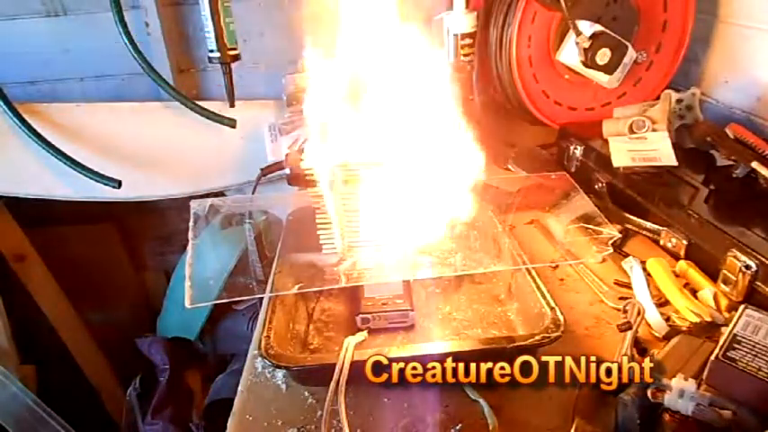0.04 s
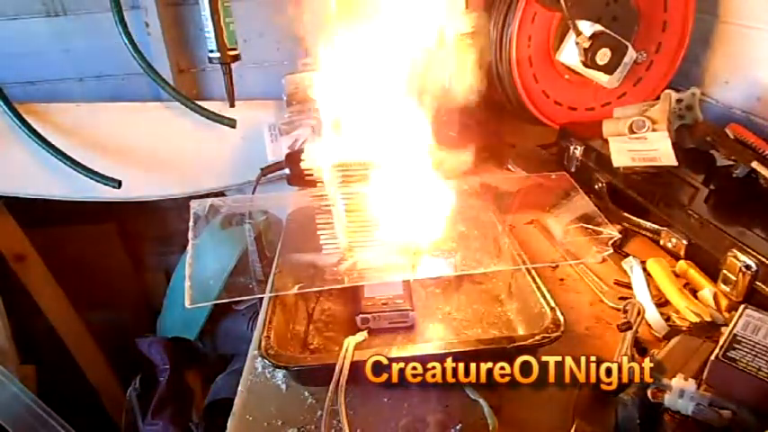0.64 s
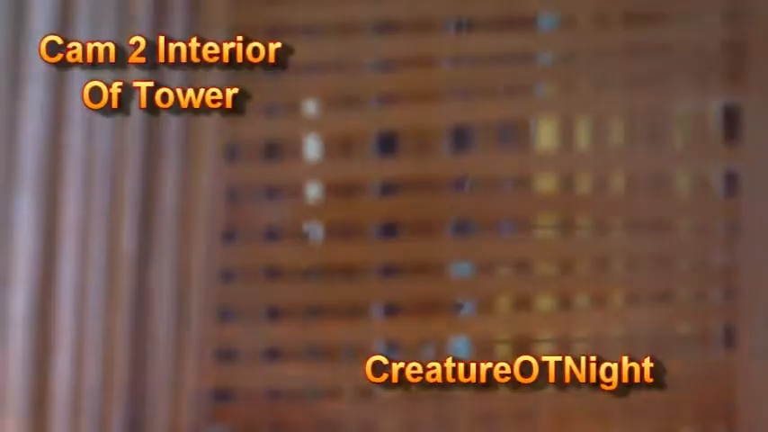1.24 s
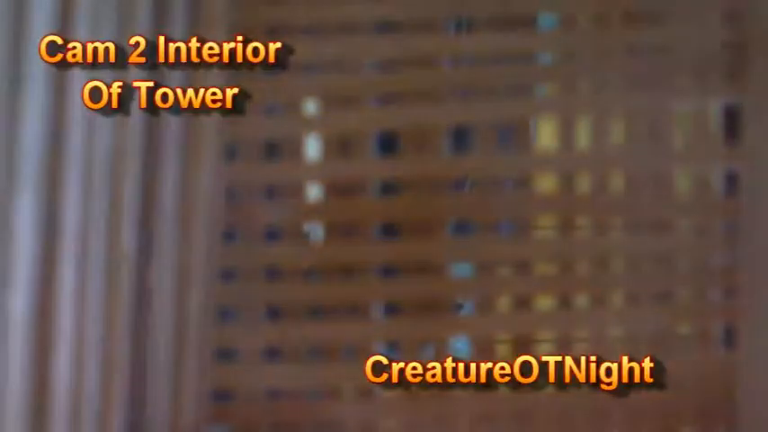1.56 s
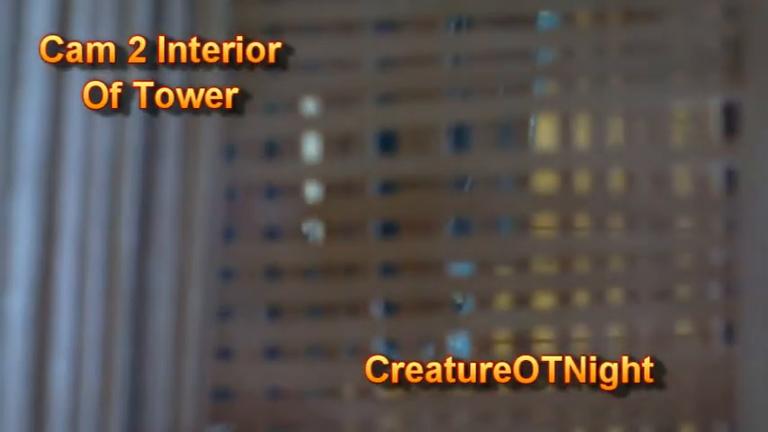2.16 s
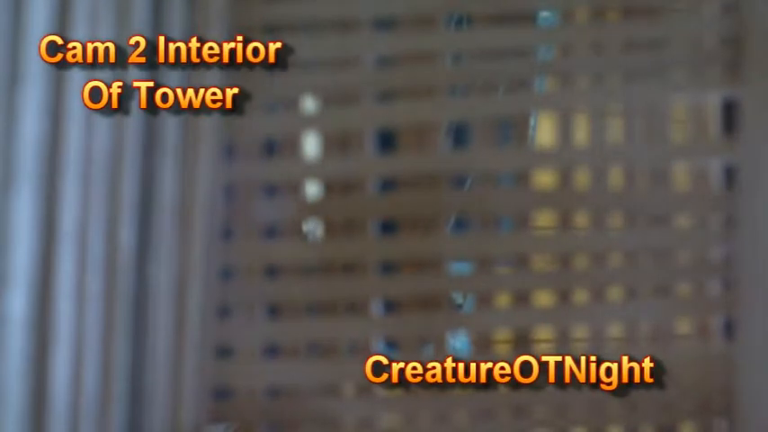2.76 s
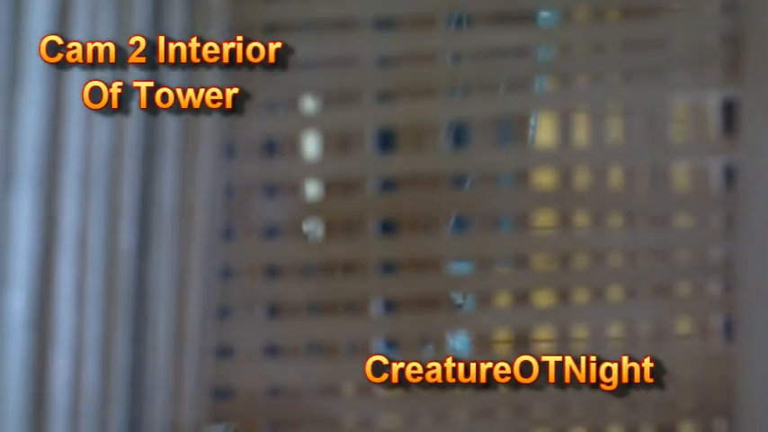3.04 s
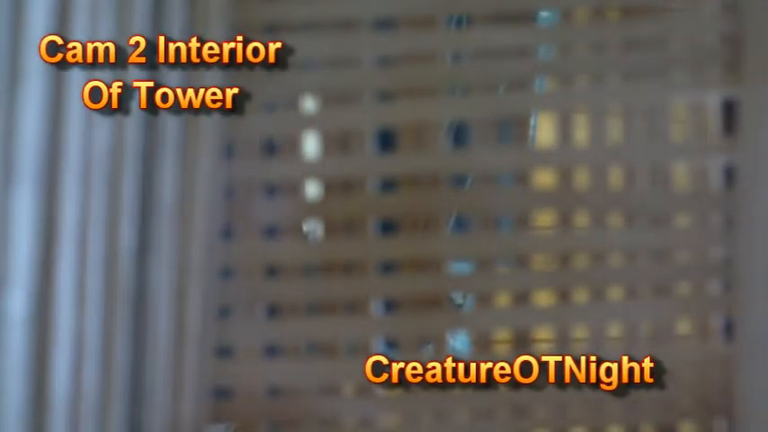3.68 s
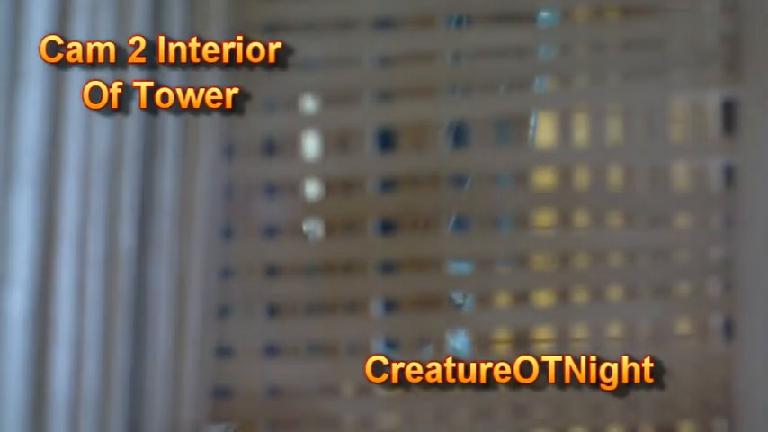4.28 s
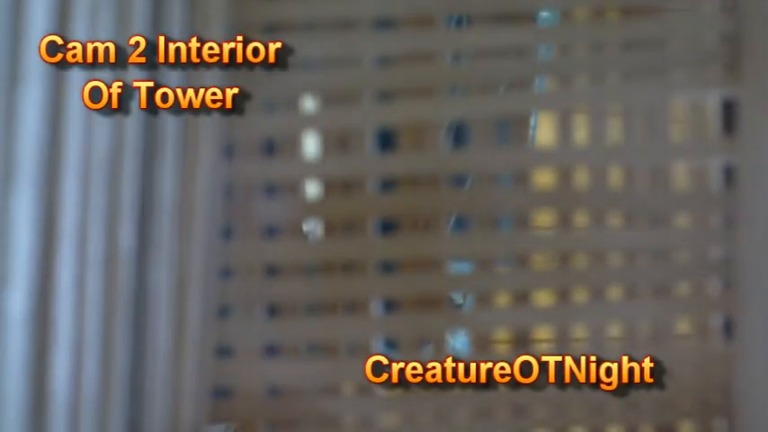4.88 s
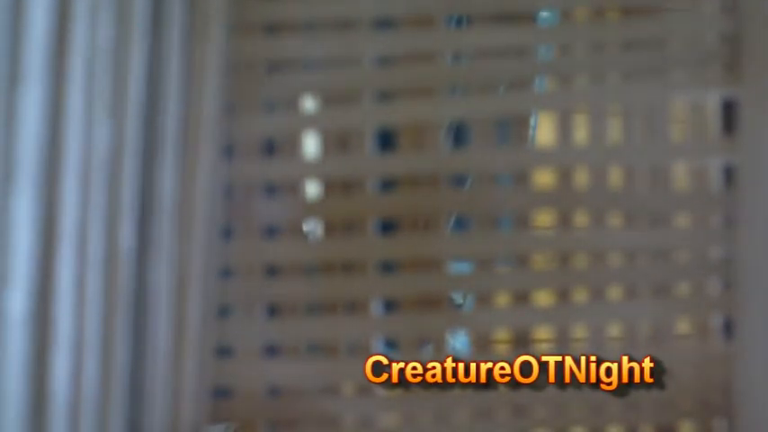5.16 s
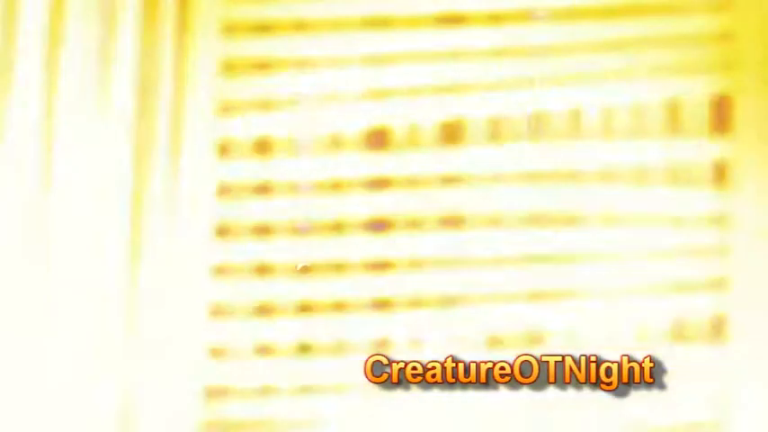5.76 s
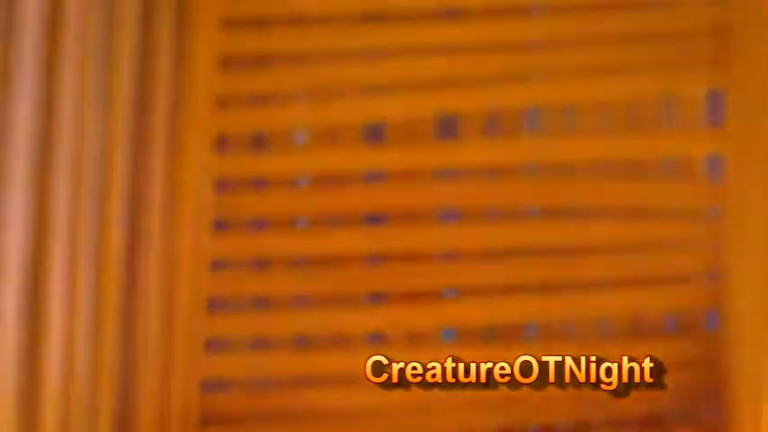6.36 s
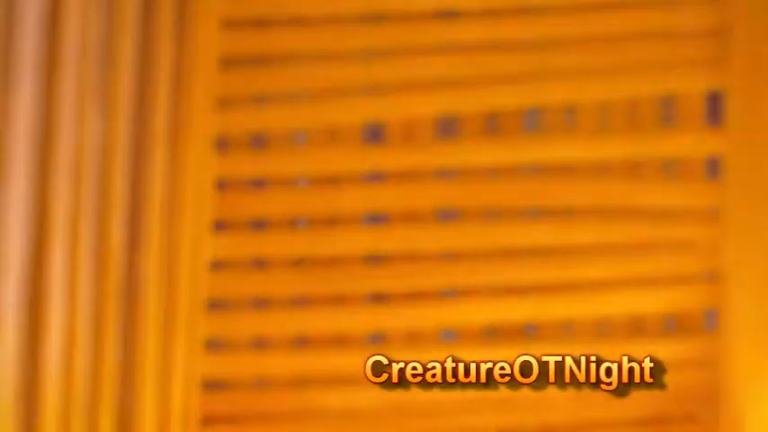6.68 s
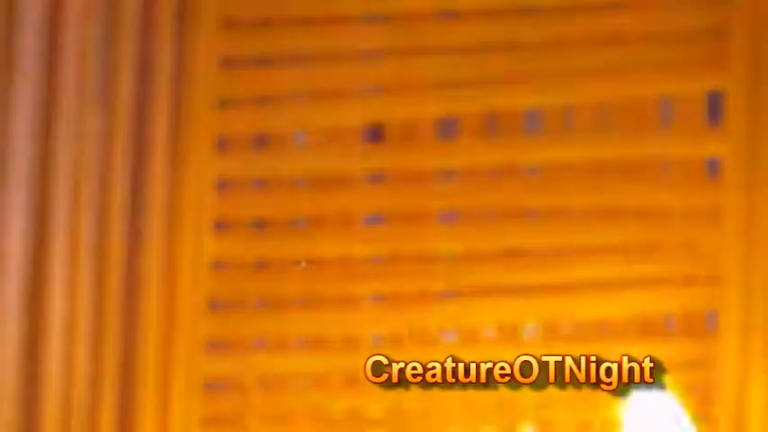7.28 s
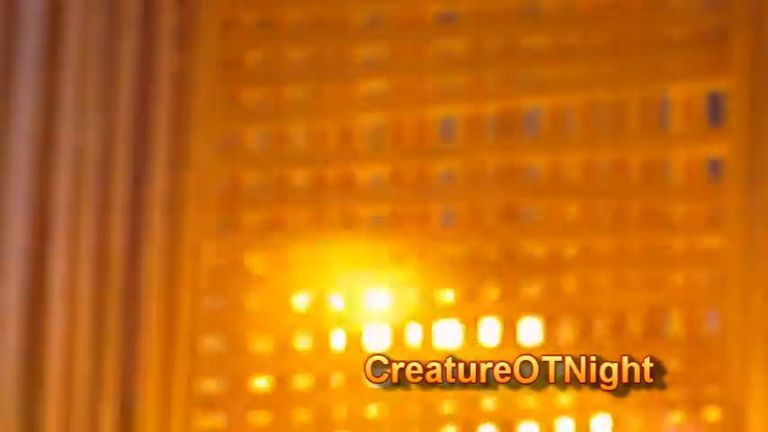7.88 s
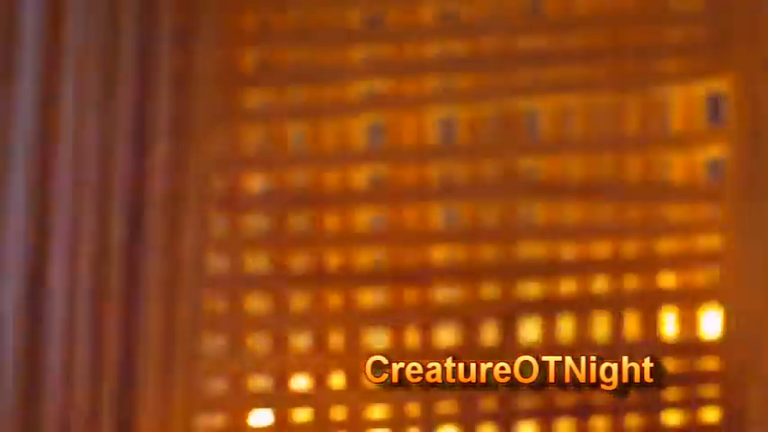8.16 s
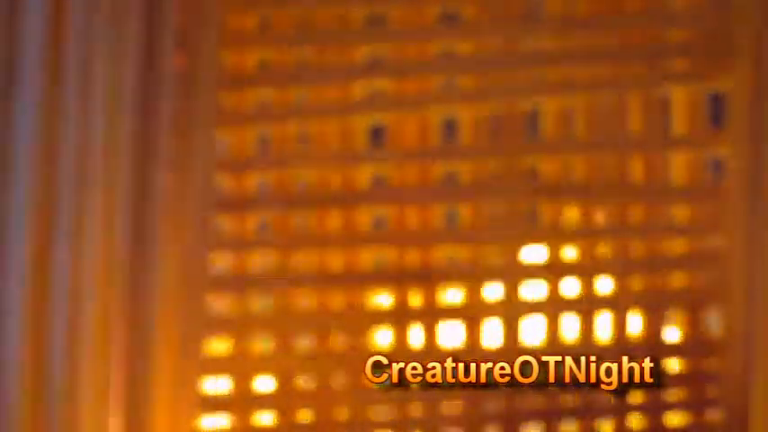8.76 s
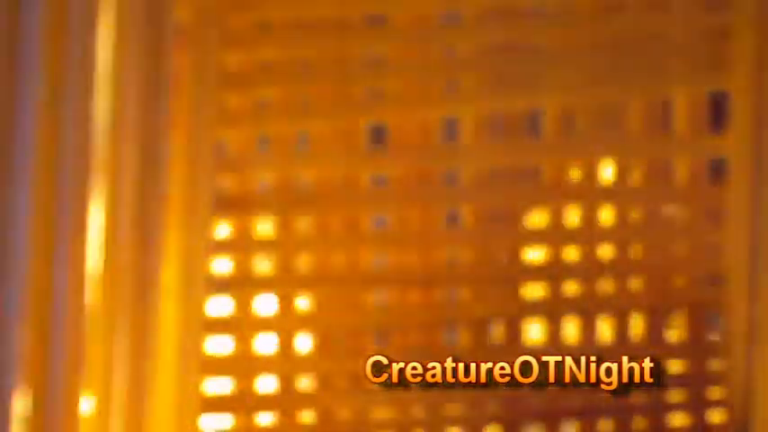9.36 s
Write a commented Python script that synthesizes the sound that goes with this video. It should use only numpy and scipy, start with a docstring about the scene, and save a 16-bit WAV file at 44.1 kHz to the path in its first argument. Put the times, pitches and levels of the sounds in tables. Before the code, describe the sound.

A soft rush of fire gives way to a cluster of knocks on a workbench, heard from inside a tower of matchsticks. Scattered knocks and thumps follow over low hiss, and a bird whistles faintly outside. Close around the microphone the matches suddenly pop alight, rush and bang. After a brief dip they burn on in a hollow, sputtering roar, with a couple of pops and a sharp double snap.

```python
"""A tower of matchsticks burns in a workshop. First a fire is heard softly from outside. From 1.2 s a
microphone inside the unlit tower hears hiss, knocks on the bench, dull thumps and a bird outdoors.
At 5.5 s the match heads catch with two pops of gas and flare up to a bang at 6.2 s. The flame sinks,
then burns on in a surging roar that rings in the gaps between the sticks, with more pops and snaps."""
import sys
import numpy as np
from scipy import signal
from scipy.fft import rfft, irfft, next_fast_len
from scipy.io import wavfile
from scipy.ndimage import uniform_filter1d, map_coordinates

SR = 44100
rng = np.random.default_rng(int(sys.argv[2]) if len(sys.argv) > 2 else 0)


def store_wav(level_fs):
    """Save 16-bit WAV to argv[1]."""
    pcm = np.round(np.clip(np.atleast_2d(level_fs), -1, 1) * 32767)
    wavfile.write(sys.argv[1], SR, pcm.T.astype(np.int16))


N = 415863
TIME = np.arange(N) / SR
AFTER = np.arange(SR * 3 // 4) / SR  # seconds since the start of one short sound
INSIDE_S, CATCH_S, BANG_S = 1.204, 5.521, 6.155
TOP_HZ = 15400

# The tone of a knock on wood: f/Hz, level/dB
WOOD_TONE = [(50, -26), (100, -28), (190, -14.5), (270, -4), (480, 1.5), (700, -11), (930, -3.5),
             (1200, -17.5), (1400, -11.5), (2700, -29.5), (3900, -30), (5200, -35), (9000, -38),
             (13000, -66)]
# Pitches at which the gaps between the sticks ring, up to the first flash: f/Hz, width/Hz, boost/dB
FIRST_GAPS = [(960, 96, 15.5), (1246, 226, 10), (2070, 190, 12), (2420, 100, 12), (3205, 36, 9),
              (3700, 130, 13), (4140, 92, 7.5), (4940, 150, 11), (5700, 220, 5), (6921, 500, 11),
              (7900, 260, 5.6), (9150, 220, 6.5)]


def amp(db):
    """Turn decibels into a number to multiply by."""
    return 10 ** (np.asarray(db) / 20)


def unit(x):
    """Scale a signal to an average size (rms) of 1."""
    return x / np.sqrt(np.mean(x ** 2) + 1e-20)


def tone(points, hz):
    """The gain at hz, on a curve through points of f/Hz, level/dB."""
    f, db = np.transpose(points)
    return amp(np.interp(np.log(hz + 1), np.log(f), db))


def curve(points):
    """Join points of time and value with straight lines."""
    return np.interp(TIME, *np.transpose(points))


def wobble(rate):
    """A smooth curve through `rate` random values a second."""
    return map_coordinates(rng.standard_normal(int(N * rate / SR) + 4), [TIME * rate])


def ramp(start, length):
    """Rise from 0 to 1 over `length` seconds."""
    return np.clip((TIME - start) / length, 0, 1)


def fade(fade_s):
    """Die away by 60 dB in fade_s seconds."""
    return np.exp(-np.log(1000) * AFTER / fade_s)


def filtered(x, response):
    """Turn each frequency in x up or down by response(hz)."""
    size = next_fast_len(len(x) + 8192, True)
    return irfft(rfft(x, size) * response(np.fft.rfftfreq(size, 1 / SR)), size)[:len(x)]


def band(hz, lo, hi):
    """A gain near 1 between lo and hi that drops steeply outside."""
    return 1 / np.sqrt((1 + (lo / (hz + 1)) ** 16) * (1 + (hz / hi) ** 16))


def noise(response, size=N):
    """Noise shaped by response(hz), with an average size of 1."""
    return unit(filtered(rng.standard_normal(size), response))


def short_noise(response):
    """Shaped noise for one short sound."""
    return noise(response, len(AFTER))


def add(track, s, sound):
    """Mix a sound into the track at s seconds."""
    part = track[round(s * SR):][:len(sound)]
    part += sound[:len(part)]


def echoes(x, fade_s):
    """Small things nearby throw back many quick echoes, of the higher pitches only."""
    bounces = rng.standard_normal(len(AFTER)) * fade(fade_s) * (AFTER > 0.003)
    echoed = signal.fftconvolve(x, bounces / np.linalg.norm(bounces))[:N]
    return filtered(echoed, lambda hz: band(hz, 1300, SR))


def drifting_tone(x, depth_db):
    """Random patches of the sound, about 600 Hz wide and 0.15 s long, get louder or softer."""
    spectrum = signal.stft(x, nperseg=512)[2]
    patches = rng.standard_normal(spectrum.shape)
    for _ in range(2):
        patches = uniform_filter1d(patches, 7, axis=0)  # smooth over pitch
        patches = uniform_filter1d(patches, 24, axis=1)  # smooth over time
    return signal.istft(spectrum * amp(depth_db * unit(patches)), nperseg=512)[1][:N]


def gap_boost_db(gaps, hz):
    """The air between the sticks boosts the pitches at which it rings."""
    return sum(db * np.exp(-((hz - centre) / width) ** 2) for centre, width, db in gaps)


def quiet_room():
    """Low room noise, a slowly sinking hiss made hollow by the tower, and the microphone's whine."""
    # The tone of the quiet inside the tower: f/Hz, level/dB
    quiet_tone = [(25, -27.5), (100, -6), (150, -10.5), (260, -5), (510, 0.5), (770, -15), (950, -7.5),
                  (1150, -17.5), (1380, -14), (1750, -26.5), (5200, -25.5), (8500, -20), (12300, -32.5),
                  (15000, -23.5)]
    # Faint electronic tones: f/Hz, level/dB
    whines = [(5426, -75), (6595, -61), (8721, -66), (14115, -72), (15278, -73)]
    room = amp(-44 + 0.53 * wobble(8)) * noise(lambda hz: tone(quiet_tone, hz) * band(hz, 15, 2150))
    hollow = lambda hz: amp(0.52 * gap_boost_db(FIRST_GAPS, hz) * band(hz, 1600, 4360))
    hiss_db = -49 - 1.05 * (TIME - INSIDE_S)
    hiss = amp(hiss_db) * noise(lambda hz: tone(quiet_tone, hz) * hollow(hz) * band(hz, 1970, SR))
    whine = sum(amp(db) * noise(lambda f: np.exp(-((f - hz) / 25) ** 2)) for hz, db in whines)
    return room + hiss + whine


def bird():
    """A bird sings thin whistles that fall fast and level off."""
    # Whistles: t/s, level/dB, length/s, start f/Hz, end f/Hz
    chirps = [(3.05, -62, 0.49, 4740, 4420), (4.678, -50.5, 0.19, 7500, 5880),
              (4.976, -51, .15, 7460, 5920), (5.257, -50.5, 0.17, 7600, 5950)]
    out = np.zeros(N)
    for s, db, length, start_hz, end_hz in chirps:
        progress = np.clip(AFTER / length, 0, 1)
        pitch = end_hz + (start_hz - end_hz) * (1 - progress) ** 2.9
        swell = np.sin(np.pi * progress ** 0.88)
        waver = 1 + 0.57 * short_noise(lambda hz: hz < 120)
        add(out, s, amp(db) * swell * waver * np.sin(2 * np.pi * np.cumsum(pitch) / SR))
    return out


def outside_fire():
    """From a distance the flames are a soft, fluttering rush; the low part swings the most."""
    # How hard the fire burns: t/s, level/dB
    strength = [(0.01, -50.5), (0.1, -45.5), (0.42, -44), (0.6, -43.5), (0.78, -50), (0.94, -46),
                (1.02, -50.5), (1.1, -43), (1.18, -53.5)]
    # The tone of the distant flames: f/Hz, level/dB
    distant_tone = [(25, -7), (60, -11), (130, -12.5), (300, -4), (480, -1.5), (750, 1), (1300, -3.5),
                    (2200, -6.5), (3500, -8), (5500, -15.5), (9000, -17.5), (14000, -20)]
    # The low, middle and high part of the flames: level/dB, swing/(dB per dB), flutter/dB
    parts = [(-8, 1.1, 1.0), (-1.5, 0.61, 0.6), (-11.5, 0.5, 0)]
    ranges_hz = [(15, 700), (700, 6500), (6500, 14300)]
    strength_db = curve(strength)
    mean_db = strength_db.mean()
    swing_db = strength_db - mean_db + 0.6 * wobble(30)
    flame = np.zeros(N)
    for (db, swing, flutter_db), (lo, hi) in zip(parts, ranges_hz):
        level = amp(mean_db + db + swing * swing_db + flutter_db * wobble(25))
        flame += level * noise(lambda hz: tone(distant_tone, hz) * band(hz, lo, hi))
    flame = drifting_tone(flame, depth_db=1.26) + amp(-7.5) * echoes(flame, fade_s=0.07)
    return filtered(flame, lambda hz: hz < 14400)


def thumps(start_hz=510, end_hz=260, sink_s=0.07):
    """Soft, hollow blows that shudder and sink in pitch as they die."""
    # Dull blows: t/s, level/dB, fade/s
    blows = [(1.287, -22, 0.19), (2.166, -31, 0.31), (4.146, -25.5, 0.41), (6.168, -11, 0.12)]
    out = np.zeros(N)
    pitch = end_hz + (start_hz - end_hz) * np.exp(-(AFTER / sink_s) ** 1.58)
    onset = 1 - np.exp(-AFTER / 0.0028)
    for s, db, fade_s in blows:
        shudder = 1 + 0.63 * short_noise(lambda hz: band(hz, 18, 96))
        body = shudder * np.sin(2 * np.pi * np.cumsum(pitch) / SR)
        puff = short_noise(lambda hz: tone(WOOD_TONE, hz) * band(hz, 166, 1130))
        add(out, s, amp(db) * (1.03 * body + 0.45 * puff) * fade(fade_s) * onset)
    return out


def bench_ring():
    """The struck bench rings with its own notes, in a slightly new mix for each blow."""
    # The notes of the bench: f/Hz, level/dB, fade/s
    notes = [(95.3, -4.5, 0.47), (157.4, -10, 0.5), (254.6, 2, 0.32), (386, -30, 0.24), (465, -1.5, 0.23),
             (918, 0, 0.26), (1360, -31, 0.14)]
    ring = np.zeros(len(AFTER))
    for hz, db, fade_s in notes:
        level = amp(db + rng.standard_normal())
        ring += level * fade(fade_s) * np.sin(2 * np.pi * (hz * AFTER + rng.random()))
    return ring * (1 - np.exp(-AFTER / 0.0025))


def knocks(fade_s=0.24):
    """Each knock has a woody body and a shorter bright edge, and sets the bench ringing."""
    # Knocks on the bench: t/s, level/dB, ring compared with that level/dB
    blows = [(1.2038, -13.5, -18.5), (1.231, -13, -31), (1.251, -17, -35), (1.285, -18.5, -19),
             (1.316, -19, -14), (1.369, -26.5, -3.5), (1.903, -15, -42), (1.936, -26, -33),
             (2.245, -33, -13), (2.311, -27.5, -22), (2.532, -29, -13), (2.617, -31.5, -8),
             (4.053, -26.5, -30), (5.289, -29, -24), (5.314, -34, -12.5)]
    out = np.zeros(N)
    for s, db, ring_db in blows:
        body = short_noise(lambda hz: tone(WOOD_TONE, hz) * band(hz, 210, 1290)) * fade(fade_s)
        edge = short_noise(lambda hz: tone(WOOD_TONE, hz) * band(hz, 1400, SR)) * fade(fade_s * 0.71)
        edge_db = -8.5 + 0.5 * db  # harder blows are brighter
        add(out, s, amp(db) * (amp(-7.5) * body + amp(edge_db) * edge + amp(ring_db) * bench_ring()))
    return out


def snaps():
    """Dry sticks snap with a short, bright burst of noise."""
    # Snapping sticks: t/s, level/dB, fade/s, change to the highest pitches/dB
    sticks = [(2.3126, -32, 0.081, -5), (2.5227, -26, 0.087, -5), (2.5307, -20, 0.12, -17),
              (2.794, -34.5, 0.054, -6), (8.2462, 2.5, 0.02, 4), (8.2783, -7, 0.019, 4)]
    # The tone of a snap: f/Hz, level/dB
    snap_tone = [(300, -14), (1500, -22), (3000, -11), (4400, -13), (5600, -7), (6500, -10.5), (8000, 0),
                 (10000, -7.5), (12500, -16), (15000, -12)]
    out = np.zeros(N)
    for s, db, fade_s, top_db in sticks:
        burst = short_noise(lambda hz: tone(snap_tone, hz) * amp(top_db * band(hz, 10800, SR)))
        add(out, s, amp(db - 8) * burst * fade(fade_s))
    return out


def flame_colour(gaps, hz):
    """The tone of the flame, boosted where the gaps ring."""
    # The tone of the flame alone: f/Hz, level/dB
    flame_tone = [(40, -41), (100, -22.5), (250, -9), (420, -1), (570, -5.5), (740, -20.5), (1800, -18.5),
                  (3500, -14.5), (6000, -23), (9300, -15), (10700, -26.5), (12800, -24), (15200, -19.5)]
    return tone(flame_tone, hz) * amp(gap_boost_db(gaps, hz))


def pops():
    """A burst of gas swings the air in the tower, cracks, and leaves a rumble in the room and bench."""
    # Gas bursts from groups of match heads: t/s, level/dB, f/Hz, fade/s, crack/dB, rumble/dB
    bursts = [(5.545, -13, 530, 0.023, 9, -28), (5.573, -16, 480, 0.042, 6.5, -16),
              (6.1661, 1, 492, 0.056, -3.5, -11), (7, -13, 211, 0.024, -18, -20),
              (7.661, -11, 413, 0.13, -1, -27)]
    crack_tone = lambda f: flame_colour(FIRST_GAPS, f) * band(f, 1200, TOP_HZ) / np.hypot(1, f / 10000)
    out = np.zeros(N)
    for s, db, hz, fade_s, crack_db, rumble_db in bursts:
        # the open tower holds no pressure, so the lowest pitches leak away
        low_cut = signal.butter(2, hz / 2, "high", fs=SR, output="sos")
        swing = signal.sosfilt(low_cut, -np.sin(2 * np.pi * hz * AFTER) * fade(fade_s))
        crack = short_noise(crack_tone) * fade(fade_s)
        room = short_noise(lambda f: tone(WOOD_TONE, f) * band(f, 150, TOP_HZ)) * fade(0.17)
        rumble = room + amp(-13) * bench_ring()
        add(out, s, amp(db) * (swing + amp(crack_db - 9.5) * crack + amp(rumble_db) * rumble))
    return filtered(out, lambda hz: band(hz, 76, SR))


def gas_jets(gaps, sputters_per_s, sputter_gain):
    """Sputtering jets of gas ring the gaps, giving a low roar, a middle rush and a high fizz."""
    sputter = unit((rng.random(N) < sputters_per_s / SR) * rng.standard_normal(N))
    gas = rng.standard_normal(N) + sputter_gain * sputter
    ringing = filtered(gas, lambda hz: flame_colour(gaps, hz))
    return np.array([unit(filtered(ringing, lambda hz: band(hz, lo, hi) * (hz < TOP_HZ)))
                     for lo, hi in [(15, 750), (750, 5800), (5800, SR)]])


def fire(whistle_hz=3140):
    """The match heads burn in surges, and the moving flame rings one set of gaps after another."""
    # How hard the heads burn in the first flash, and in the blaze after the bang: t/s, level/dB
    flash = [(5.56, -24.5), (5.61, -27.5), (5.66, -29), (5.78, -23.5), (5.88, -21.0), (6.08, -20.5),
             (6.15, -22.5)]
    blaze = [(6.27, -42), (6.42, -42.5), (6.56, -45.5), (6.8, -33.5), (7.1, -30), (7.27, -26.5),
             (7.55, -26), (7.78, -27), (8.0, -23.5), (8.17, -24), (8.38, -32.5), (8.55, -28.5),
             (8.69, -29.5), (8.8, -23.0), (8.98, -23.5), (9.12, -29.5), (9.28, -28.5), (9.36, -24.5)]
    # The gaps that ring in the blaze, and near the end: f/Hz, width/Hz, boost/dB
    blaze_gaps = [(980, 145, 3.2), (1182, 300, 12.8), (1680, 30, 11.4), (2053, 155, 12.8), (2358, 64, 10.3),
                  (2730, 140, 5.9), (3170, 93, 12.4), (4010, 250, 7.8), (4980, 250, 5.7), (5460, 57, 9),
                  (7320, 290, 12), (8000, 65, 5.2)]
    late_gaps = [(1314, 346, 12), (2050, 144, 11.4), (2430, 43, 12.6), (2740, 50, 2.7), (3200, 75, 11),
                 (3367, 210, 7.7), (4200, 530, 7), (5740, 216, 6.4), (6880, 430, 8.4), (7530, 110, 12),
                 (7800, 110, 8.4), (8370, 120, 11.5)]
    to_blaze, to_late = ramp(5.99, 1.54), ramp(8.15, 0.27)
    roar, rush, fizz = (np.sqrt(1 - to_blaze) * gas_jets(FIRST_GAPS, 900, 0.54)
                        + np.sqrt(to_blaze * (1 - to_late)) * gas_jets(blaze_gaps, 1200, 0.51)
                        + np.sqrt(to_late) * gas_jets(late_gaps, 1000, 0.43))
    # one jet blows across a gap and sings hoarsely
    whistle_level = amp(-15.5 + 3.1 * wobble(9)) * ramp(7.18, 0.015)
    whistle = whistle_level * noise(lambda hz: np.exp(-((hz - whistle_hz) / 65) ** 2))
    draught_db = 5 * (TIME > BANG_S) * (1 - ramp(BANG_S, 2.5))  # extra roar after the bang
    cold_db = -6.5 * (1 - ramp(5.76, 0.26))  # the fizz is weak until the tower is hot
    spent_db = -4 * ramp(8.62, 0.29)  # and weakens again as the heads are used up
    roar = roar * amp(-0.1 + draught_db + 0.65 * wobble(25))
    fizz = fizz * amp(-0.92 + cold_db + spent_db + 0.65 * wobble(35))
    flutter_db = 0.52 * wobble(32)  # heads flare one after another
    burn = amp(curve(np.vstack([flash, blaze])) + flutter_db) * (roar + rush + whistle + fizz)
    catch_db = -10 * (1 - ramp(CATCH_S, 0.026))  # the first heads take light
    choke_db = -8 * (ramp(BANG_S, 0.054) - ramp(BANG_S + 0.057, 0.062))  # the bang blows the flame down
    return burn * ramp(CATCH_S, 0.0048) * amp(catch_db + choke_db)


def scene():
    """The outer microphone gives way to the inner one; left and right are the same."""
    inside = quiet_room() + drifting_tone(fire(), depth_db=1.0) + knocks()
    inside += amp(-9.5) * echoes(inside, fade_s=0.08)
    inside += thumps() + bird() + pops() + snaps()
    deaf_hz = 11270  # the inner microphone misses the pitches around this one
    inside = filtered(inside, lambda hz: np.abs(hz - deaf_hz) / np.hypot(hz - deaf_hz, 600))
    mono = np.where(TIME < INSIDE_S, outside_fire(), inside)
    return np.array([mono, mono])


def record(dry):
    """The recorder rounds off the loudest peaks and cuts the pitches above TOP_HZ."""
    rounded = dry / (1 + np.abs(dry) ** 6) ** (1 / 6)
    high_cut = lambda hz: 0.5 - 0.5 * np.tanh((hz - TOP_HZ) / 60)
    return np.array([filtered(channel, high_cut) for channel in rounded])


dry = scene()
out = record(dry)
store_wav(out)
```